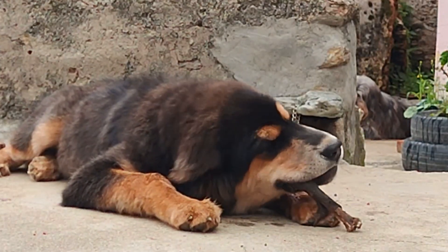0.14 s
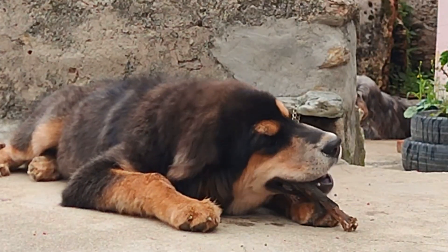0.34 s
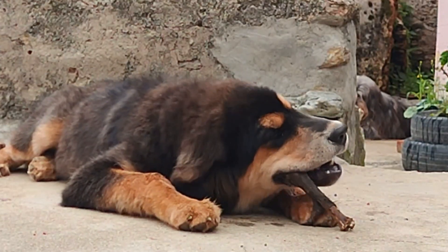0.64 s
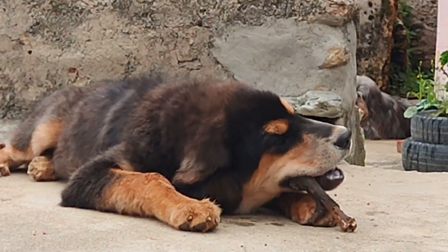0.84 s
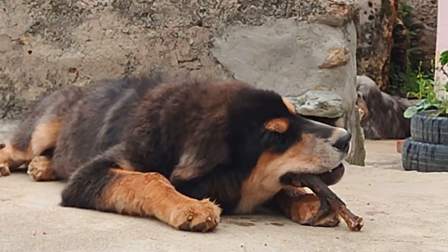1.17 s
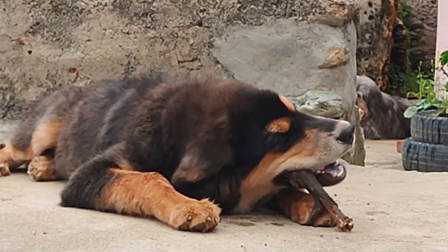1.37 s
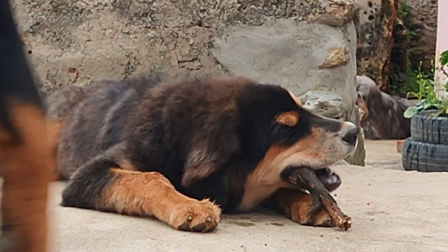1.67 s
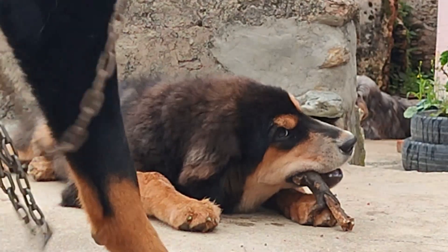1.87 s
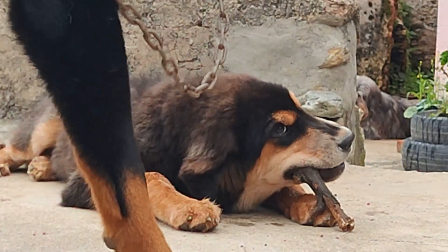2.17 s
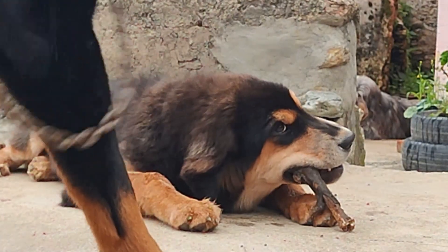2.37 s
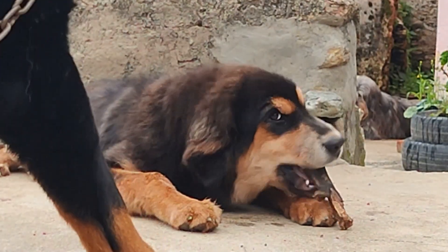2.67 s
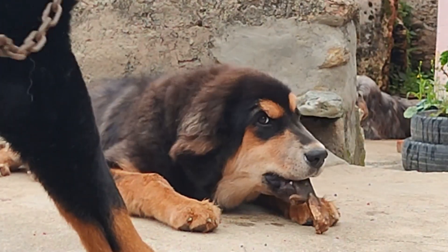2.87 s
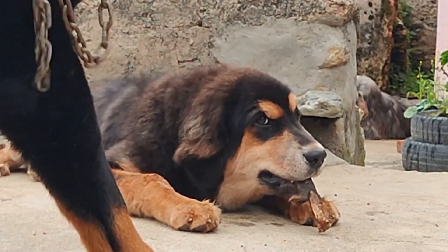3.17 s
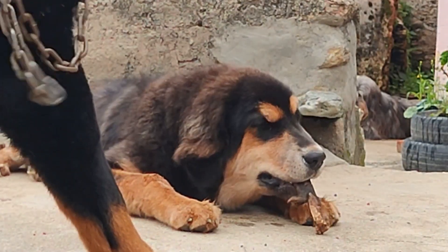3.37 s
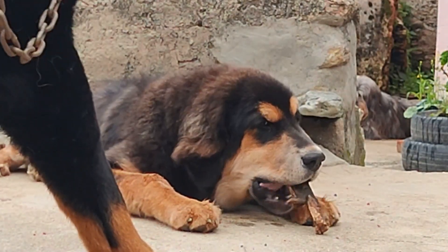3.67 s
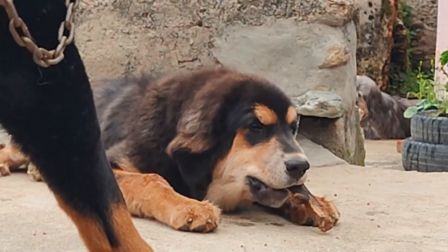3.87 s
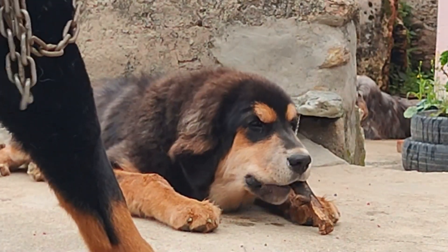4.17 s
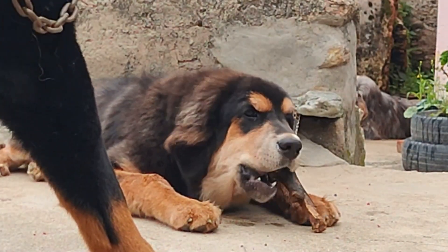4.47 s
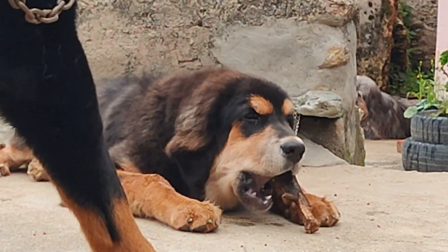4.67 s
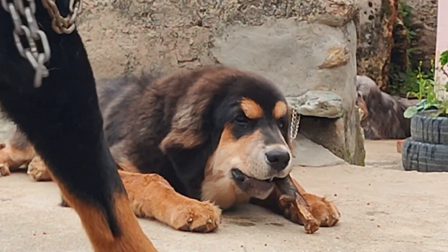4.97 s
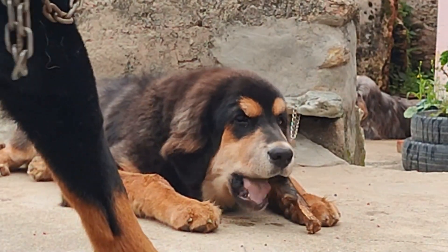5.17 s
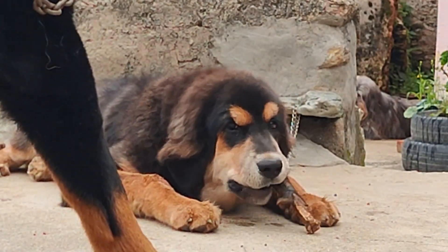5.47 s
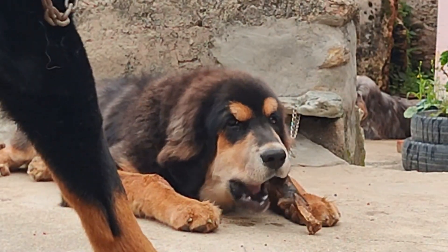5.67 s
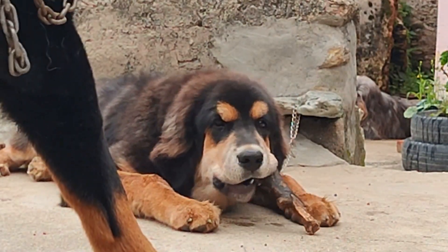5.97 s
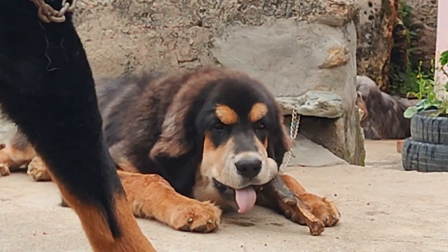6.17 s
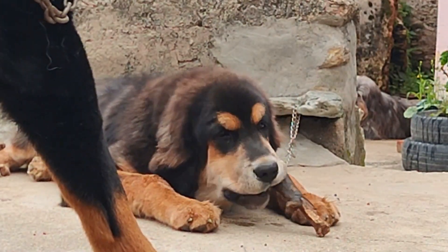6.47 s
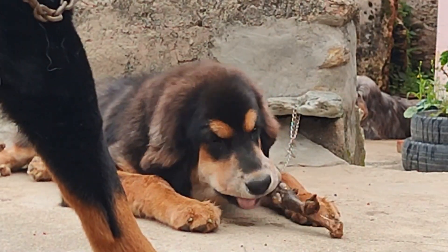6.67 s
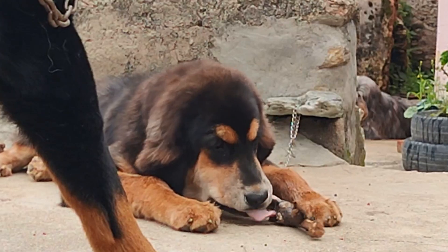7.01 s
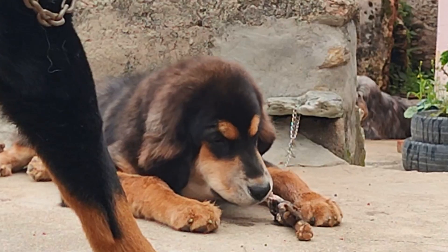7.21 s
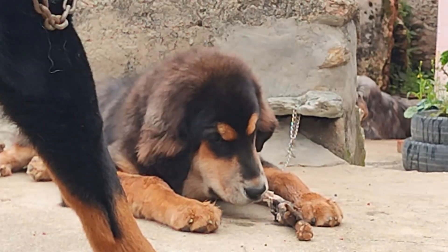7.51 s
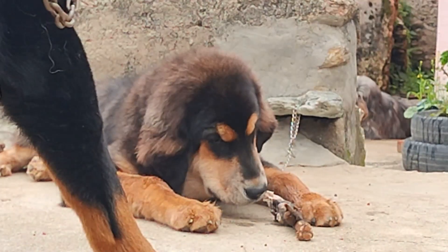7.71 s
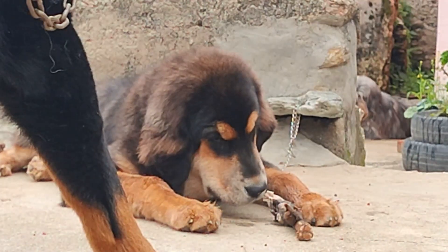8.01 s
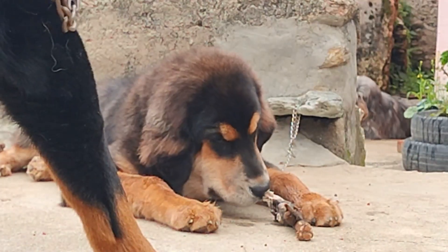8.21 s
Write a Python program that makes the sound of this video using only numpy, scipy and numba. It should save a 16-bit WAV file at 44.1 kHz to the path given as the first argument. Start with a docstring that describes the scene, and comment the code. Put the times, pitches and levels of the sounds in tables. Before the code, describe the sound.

A close stereo pickup in a walled concrete yard, with low rumble, faint hum, hiss and insects throughout. A short, low growl opens at 0 to 0.3 s, with a loud stick crack at 0.2 s and a smaller one near 1 s. A second rattling growl runs from 1.1 to 1.7 s. The chain jangles and slides at 1.7 to 2.1 s, then paws scuff and thud softly and the stick snaps at 2.2 s. The growl from 2.4 to 3.6 s is stronger, flaring into a snarl; a chain clink sounds at 3.2 s. Breathy sniffs follow around 3.7 to 4.2 s. The raspiest growl lasts from 4.2 to 5.4 s, another from 6 to 6.7 s darkens and softens, and a weak, humming one closes at 7.1 to 7.65 s. A bird chirps throughout, with rising trills at 1.4 and 5 s and warbles from 3.8 and 6.35 s; faint distant chatter ends it.

```python
"""In a concrete yard a big puppy lies gnawing a stick and growls six times at a chained dog that steps up.
Its vocal folds buzz while slower, looser folds chop the buzz into a rattle; throat and mouth then ring with it.
The growl flares as the jaw bites, and a shut jaw darkens it. The stick cracks in short ringing bursts, chain links
clink and slide as ringing noise, paws scuff as coloured noise, low tones thud, and a small bird twitters in gliding
tones echoed by the walls, over a low rumble, faint hum and hiss, insects and far birds, all from filtered noise."""
import sys
import numpy as np
from scipy import signal
from scipy.fft import rfft, irfft
from scipy.io import wavfile
from scipy.ndimage import uniform_filter1d
from numba import njit

SR = 44100
rng = np.random.default_rng(int(sys.argv[2]) if len(sys.argv) > 2 else 0)


def waveform_to_disk(signal):
    """Save audio, clipped to [-1, 1], as 16-bit WAV at the path in sys.argv[1]."""
    frames = np.transpose(np.atleast_2d(signal))
    scaled = np.clip(frames, -1, 1) * 32767
    samples = np.round(scaled).astype(np.int16)
    wavfile.write(sys.argv[1], SR, samples)


N = 368087
TIME = np.arange(N) / SR


def undb(db):
    """Turn decibels into a gain."""
    return 10 ** (np.asarray(db) / 20)


def unit(x):
    """Scale a sound to an average (rms) strength of 1."""
    return x / np.sqrt(np.mean(x ** 2) + 1e-20)


def steady(x, span_s=0.044):
    """Even out slow changes of strength, keeping single pulses."""
    size = max(int(span_s * SR), 2)
    power = uniform_filter1d(uniform_filter1d(x * x, size), size)
    return x / np.sqrt(np.abs(power) + 1e-14)


def walk(rate):
    """Smooth random wandering with a spread near 1; rate is in new values per second."""
    count = int(SR / rate)
    steps = np.repeat(rng.standard_normal(N // count + 1), count)
    return 1.3 * uniform_filter1d(steps, count)[:N]


def noise(points):
    """Noise of strength 1 whose tone colour follows points (frequency [Hz], level [dB])."""
    hz, db = np.transpose(points)
    bins_hz = np.arange(N // 2 + 1) * SR / N
    gain = undb(np.interp(np.log(bins_hz + 1), np.log(hz), db))
    return unit(irfft(rfft(rng.standard_normal(N)) * gain, N))


def cut(x, hz, kind, order=2):
    """Remove part of the spectrum with a Butterworth filter."""
    return signal.sosfilt(signal.butter(order, hz, kind, fs=SR, output="sos"), x)


@njit
def svf(x, hz, width):
    """A band-pass filter whose centre and width can move (state-variable form)."""
    y, band, low = np.empty(len(x)), 0., 0.
    for i in range(len(x)):
        g, k = np.tan(np.pi * hz[i] / SR), width[i] / hz[i]
        v = (band + g * (x[i] + 1e-18 - low)) / (1 + g * (g + k))
        band, low, y[i] = 2 * v - band, low + 2 * g * v, k * v
    return y


def ring(x, hz, width_hz):
    """One resonance, with a gain of 1 at its centre."""
    return svf(x, hz + np.zeros(N), width_hz + np.zeros(N))


def formant(x, hz, width_hz):
    """A resonance with steep sides: the same ring twice in a row."""
    return ring(ring(x, hz, width_hz), hz, width_hz)


def add(out, s, sound):
    """Mix a sound in at a time in seconds."""
    i = max(int(s * SR), 0)
    out[i:i + len(sound)] += sound[:N - i]


def swells(table):
    """Rounded envelopes from rows (time [s], length [s], level [dB])."""
    out = np.zeros(N)
    for s, length, db in table:
        add(out, s, undb(db) * signal.windows.tukey(int(length * SR), .5))
    return out


def ticks(table, decay_s):
    """Sharp, quickly dying noise bursts from rows (time [s], peak level [dB])."""
    out, t = np.zeros(N), TIME[:SR // 20]
    for s, db in table:
        burst = rng.standard_normal(len(t)) * np.exp(-t / decay_s)
        add(out, s, undb(db) * burst / np.abs(burst).max())
    return out


def bump(s, half_s):
    """A bell-shaped swell around a moment."""
    return np.exp(-((TIME - s) / half_s) ** 2)


def walls(x, wet_db, t60_s):
    """Direct sound plus scattered returns from the yard walls, different in each ear."""
    t = TIME[:SR // 2]
    fade = np.exp(-np.log(1000) * t / t60_s)  # 60 dB down after t60_s
    tails = rng.standard_normal((2, len(t))) * fade * (t > .004)
    tails /= np.sqrt(np.sum(tails ** 2, axis=1, keepdims=True))
    return x + undb(wet_db) * signal.fftconvolve(x[None], tails, axes=1)[:, :N]


def closures(phase):
    """A unit pulse at every whole turn of a phase, shared between two samples."""
    i = np.flatnonzero(np.diff(np.floor(phase)))
    late = (np.ceil(phase[i]) - phase[i]) / (phase[i + 1] - phase[i])
    out = np.zeros(N)
    out[i], out[i + 1] = 1 - late, late
    return out


# rate of the loose folds at one vocal fold rate [Hz], and the power by which it follows
LOOSE_HZ, LOOSE_AT_FOLD_HZ, LOOSE_FOLLOW = 96.24, 224.1, .6


def larynx(fold_hz, rattle, unsteady, jitter=.072, slow_jitter=.125, shimmer_db=2.36,
           chop=1.2, bias=0.59, flap=0.52):
    """Vocal fold pulses chopped by slower loose folds, and the pure hum of both pairs of folds."""
    wandering_hz = fold_hz * np.exp(jitter * rattle * walk(200) + 0.0079 * walk(30))
    fast = np.cumsum(wandering_hz) / SR
    slow_hz = LOOSE_HZ * (fold_hz / LOOSE_AT_FOLD_HZ) ** LOOSE_FOLLOW
    slow = np.cumsum(slow_hz * np.exp(slow_jitter * walk(100))) / SR
    # the loose folds let a pulse through or smother it, leaving ones and twos that beat into a throb
    gate = np.clip(bias + chop * np.cos(2 * np.pi * slow), 0, 1)
    buzz = closures(fast) * (1 - np.clip(rattle, 0, 1) * (1 - gate))
    buzz = buzz * undb(shimmer_db * unsteady * walk(130))
    fold_hum = unit(np.sin(2 * np.pi * fast) - np.cos(2 * np.pi * fast))
    loose_hum = unit(np.cos(2 * np.pi * slow))
    return buzz, fold_hum - flap * rattle * loose_hum


# the six growls, with the levels they set out from before pushes, bites and fading:
# (time [s], length [s], throat level [dB], mouth level [dB], rasp level [dB],
#  pure hum beside the throat [ratio], unsteadiness [ratio])
GROWL_STARTS = [(-.03, .35, -30, -37.5, -42, 0.4, 1.3), (1.118, 0.62, -30, -32.5, -38, .05, 1.26),
                (2.448, 1.11, -24, -32.5, -34.5, .05, .8), (4.239, 1.123, -22.5, -27, -31, 0.095, 0.62),
                (5.992, .72, -26, -35.5, -40, 0.62, 1), (7.123, 0.527, -32.5, -48, -49, 1.35, 1.6)]
# course of the voice through the growls: (time [s], mean vocal fold rate [Hz], rattle depth [0-1],
#  mouth resonance [Hz], mean snarl resonance [Hz])
VOICE_COURSE = [(0, 186.2, 0.81, 936, 1750), (.32, 187, 0.97, 887, 1900), (1.121, 205.7, .92, 920, 1820),
                (1.4, 199.7, 0.98, 1060, 1760), (1.75, 193.3, 0.96, 1070, 1840),
                (2.46, 237.4, 0.97, 1090, 1730), (2.68, 243.6, 0.89, 936, 1700),
                (2.761, 245.5, 0.84, 850, 1710), (2.859, 232.5, 0.86, 730, 1660),
                (3, 228.1, .85, 777, 1548), (3.25, 216.2, 1, 1015, 1510), (3.54, 211, 0.94, 884.8, 1669),
                (4.24, 241.1, .92, 956, 1570), (4.421, 237.7, 0.95, 955, 1761),
                (4.72, 227.6, 1, 1078, 1550), (4.88, 213.1, 0.95, 762, 1720), (5.179, 220.3, 1, 1000, 1560),
                (5.359, 223.2, 0.81, 717, 1829), (6.001, 226, .98, 1020, 1540), (6.149, 226, 1, 910, 1808),
                (6.266, 219.1, 0.7, 681.3, 1797), (6.62, 215, 0.84, 774, 1860),
                (6.681, 214, 0.1, 740, 1900), (7.14, 198, 0.13, 689, 1855),
                (7.21, 208.2, 0.86, 739.6, 1817), (7.539, 198.6, .85, 688, 1850),
                (7.59, 197.4, 0.48, 695, 1830), (7.649, 185.2, 0.5, 697, 1858)]
# the puppy pushes harder within a growl, or slackens: (time [s], half length [s], throat level change [dB])
VOICE_PUSHES = [(0.245, 0.0096, -24), (1.168, 0.033, 4.5), (1.31, 0.01, -15), (1.695, 0.071, 3.5),
                (3.014, 0.33, 5.5), (4.583, 0.13, 3), (5.348, 0.014, 7.5), (6.335, 0.088, 3),
                (6.71, 0.15, -3.5), (7.22, 0.043, 6.5), (7.439, 0.019, -5), (7.59, 0.032, 4)]
# the jaw bites down on the stick in mid-growl and the voice flares:
# (time [s], half length [s], mouth level change [dB], rasp level change [dB])
STICK_BITES = [(2.702, 0.13, 8.5, 6.5), (2.76, 0.023, 1, 6), (2.938, 0.087, 7.5, 4), (4.393, 0.033, 2.5, 7),
               (4.822, 0.052, 5.5, 4), (5.257, 0.03, 9, 8.5), (6.156, .05, 6.5, 4), (6.491, .09, 5, -1.5),
               (7.218, .025, 9, -2)]
ATTACK_S, RELEASE_S = 0.015, .018
LIPS_PART_S = 0.037  # the mouth comes in more slowly than the throat
OPEN_HZ, SHUT_HZ = 1017, 706  # mouth resonance with the jaw open and shut
SHUT_MOUTH_DB, SHUT_RASP_DB = -2, -9.5  # what a shut jaw does
THROAT_FADE_DB_PER_S, MOUTH_FADE_DB_PER_S, RASP_FADE_DB_PER_S = 3, 9, 11.5  # the air runs out
MOUTH_PUSH, RASP_PUSH = 0.51, 0.91  # shares of a push, in dB, that reach the mouth and the rasp


def gestures():
    """Growls fade as the air runs out; pushes swell them, bites flare them, a shut jaw darkens them."""
    s, *course = np.transpose(VOICE_COURSE)
    fold_hz, rattle, mouth_hz, snarl_hz = (np.interp(TIME, s, column) for column in course)
    shut = np.clip((OPEN_HZ - mouth_hz) / (OPEN_HZ - SHUT_HZ), 0, 1)
    push_db = sum(db * bump(s, half_s) for s, half_s, db in VOICE_PUSHES)
    mouth_flare_db, rasp_flare_db = sum(
        np.outer(flare_db, bump(s, half_s)) for s, half_s, *flare_db in STICK_BITES)
    mouth_change_db = MOUTH_PUSH * push_db + mouth_flare_db + SHUT_MOUTH_DB * shut
    rasp_change_db = RASP_PUSH * push_db + rasp_flare_db + SHUT_RASP_DB * shut
    controls = np.zeros(N)
    for start, length, throat_db, mouth_db, rasp_db, *manner in GROWL_STARTS:
        age = np.clip(TIME - start, 0, length)
        voiced = np.clip(np.minimum(age / ATTACK_S, (length - age) / RELEASE_S), 0, 1)
        lips = np.minimum(age / LIPS_PART_S, 1)
        levels_db = [throat_db + push_db - THROAT_FADE_DB_PER_S * age,
                     mouth_db + mouth_change_db - MOUTH_FADE_DB_PER_S * age,
                     rasp_db + rasp_change_db - RASP_FADE_DB_PER_S * age]
        this = np.broadcast_arrays(voiced, lips, *levels_db, *manner)
        controls = np.where(TIME >= start, this, controls)
    return fold_hz, rattle, mouth_hz, snarl_hz, *controls


# throat and nose resonances, levels relative to one another: (frequency [Hz], width [Hz], level [dB])
THROAT_RESONANCES = [(93, 37, -1), (172, 32, -4.5), (226.6, 77, -3.5), (390.6, 57, 1.5), (449, 39, 1),
                     (670, 30, -1)]
SNARL_WIDTH_HZ = 483  # of each of the snarl's two rings
# a faint resonance high in the head, above the snarl
HEAD_HZ, HEAD_WIDTH_HZ, HEAD_DB = 2840, 680, -18


def growl(lag_s=.0001, tremor_db=1.5, snap_db=2.5, gape=1.0, tongue=0.039, puff=5, puff_hz=170,
          turbulence=0.045, mouth_lag_s=.0009):
    """Larynx pulses ring the fixed throat and the moving mouth and lips."""
    (fold_hz, rattle, mouth_hz, snarl_hz, voiced, lips,
     throat_db, mouth_db, rasp_db, hum_ratio, unsteady) = gestures()
    closing, hum = larynx(fold_hz, rattle, unsteady)
    # each closure cuts the airflow: a drop in pressure
    pulses = -closing
    throat = np.zeros(N)
    for hz, width, db in THROAT_RESONANCES:
        breath = turbulence / 2 * rattle * rng.standard_normal(N)
        throat += undb(db) * ring(pulses + breath, hz, width)
    throat = cut(cut(throat, 631, "low", order=6), 71, "high", order=2)
    # a gentle growl closes the folds softly, so their fundamentals lead
    throat = steady(throat) + hum_ratio * hum
    # some closures snap harder than others, and the turbulent air puffs up after each
    sharp = pulses * undb(snap_db * unsteady * walk(150))
    puffs = puff * cut(sharp, puff_hz, "low", order=1) - turbulence
    rasp = sharp + puffs * rng.standard_normal(N)
    mouth = ring(pulses + .5 * rasp, mouth_hz, 130)
    mouth = ring(ring(mouth, 0.65 * mouth_hz, 190), 0.81 * mouth_hz, 590)
    # a gaping jaw adds a higher resonance
    wide = gape * np.clip((mouth_hz - OPEN_HZ) / 150, 0, 1)
    mouth = steady(mouth) + wide * steady(formant(rasp, 1.28 * mouth_hz, 330))
    # the snarl moves with the lips, and the tongue makes it waver
    snarl = formant(rasp, snarl_hz * (1 + tongue * walk(20)), SNARL_WIDTH_HZ)
    head = snarl - undb(HEAD_DB) * formant(rasp, HEAD_HZ, HEAD_WIDTH_HZ)
    head = cut(head, 3360, "low", order=5)
    # a weak growl flutters more than a well-driven one
    strength = voiced * undb(tremor_db * unsteady * walk(60))
    low = strength * steady(throat) * undb(throat_db)
    high = strength * lips * (steady(mouth) * undb(mouth_db) + steady(head) * undb(rasp_db))
    # each pulse leaves the mouth as a crest just after the dip in the throat
    high = -np.interp(TIME - mouth_lag_s, TIME, high)
    # the mouth is aimed at the left side, which the growl reaches first; the bass spreads all round
    low, high = walls(low, wet_db=-16, t60_s=.25), walls(high, wet_db=-9.5, t60_s=.16)
    left, right = low + high * undb([[3], [-3.8]])
    return np.array([left, np.interp(TIME - lag_s, TIME, right)])


# colour of the outdoor rumble and hiss: (frequency [Hz], relative level [dB per Hz])
YARD_COLOUR = [(25, 10), (120, 5.5), (200, 4.5), (320, 1.5), (1100, -11.5), (2700, -8), (3300, -10.5),
               (6000, -8), (7600, -10), (8800, -31.5), (14000, -24.5)]
YARD_DB = -48  # mean level of the part shared by both sides
# steady low tones: (frequency [Hz], level [dB])
HUM_TONES = [(94, -61), (139, -56)]
# insect bands, level before slow wavering: (frequency [Hz], half the width of each of two rings [Hz], level [dB])
INSECT_BANDS = [(3976, 240, -54), (6876, 93, -59)]
# other birds chatter far off, level before wavering: (time [s], length [s], level of each of two bands [dB])
FAR_CHATTER = [(7.3, 0.25, -51), (7.76, 0.15, -51)]


def yard():
    """Outdoor rumble, mostly alike on both sides, a wavering hum, and insects and far birds from all round."""
    side = cut(noise(YARD_COLOUR), 900, "high", order=1) + .5 * cut(noise(YARD_COLOUR), 40, "low")
    air = undb(YARD_DB + walk(11)) * (noise(YARD_COLOUR) + side * np.array([[1], [-1]]))
    # very narrow bands of noise sound like wavering tones
    hum = sum(undb(db) * unit(ring(rng.standard_normal(N), hz, 2.5)) for hz, db in HUM_TONES)
    ears = []
    for _ in range(2):
        insects = np.zeros(N)
        for hz, width, db in INSECT_BANDS:
            insects += undb(db + walk(27)) * unit(formant(rng.standard_normal(N), hz, 2 * width))
        chatter = sum(unit(formant(rng.standard_normal(N), hz, hz / 5)) for hz in (2750, 4900))
        ears.append(insects + chatter * swells(FAR_CHATTER) * undb(2 * walk(60)))
    return air + hum + np.array(ears)


# teeth crack or tap the stick, levels before echoes and panning:
# (time [s], starting level [dB], ringing frequency [Hz], ring decay [s])
STICK_CRACKS = [(0.1954, -13.5, 1490, 0.0017), (.56, -34.5, 680, 0.0026), (1.014, -20.5, 1490, 0.00052),
                (2.187, -15.5, 2720, 0.00083)]
# the puppy draws air between growls, before flutter, echoes and panning: (time [s], length [s], level [dB])
AIR_SNIFFS = [(2.235, 0.059, -43.5), (3.69, 0.06, -42.5), (3.83, 0.067, -46), (3.9, 0.31, -48.5),
              (5.68, 0.29, -47.5)]


def chewing():
    """The stick cracks between the teeth and rings briefly; air hisses past it."""
    cracks, t = np.zeros(N), TIME[:SR // 20]
    for s, db, hz, decay_s in STICK_CRACKS:
        add(cracks, s, undb(db) * np.exp(-t / decay_s) * np.sin(2 * np.pi * hz * t))
        crunch = cut(ticks([(s, db)], decay_s=0.0026), [1000, 3 * hz], "band")
        cracks += crunch * undb(-0.5)
    air = noise([(150, -17.5), (550, -3), (900, -8.5), (1250, -6), (1750, -2.5), (2400, -16.0), (12000, -92)])
    sniffs = air * swells(AIR_SNIFFS) * undb(2 * walk(45))
    return walls(cracks + sniffs, wet_db=-2.0, t60_s=0.47) * undb([[1.5], [-1.5]])  # a little to the left


# strokes of one twitter, before each twitter's own pitch and level:
# (delay [s], length [s], start [Hz], end [Hz], level change [dB])
TWITTER_STROKES = [(0, 0.031, 5430, 7654, 1.5), (0.03, 0.0163, 5044, 3965, -3),
                   (0.067, .026, 5500, 7000, 2.5), (.082, 0.019, 6700, 4560, -5.5)]
TWITTER_GAP_S, FIRST_PITCH, PITCH_STEP = .155, 0.91, 0.039  # pitch as a ratio, and its rise per twitter
TRILL_DB, TRILL_SWELL_DB = -28, 7  # level it swells towards, and how far below it the first twitter lies
SECOND_VOICE_DB = -10  # beside the first voice


def trill(second_voice=2.4, bend=0.41, count=4):
    """Twitters rise and swell, while a softer second voice sweeps down into each stroke."""
    strokes = []
    for k in range(count):
        ratio = FIRST_PITCH + PITCH_STEP * k
        twitter_db = TRILL_DB - TRILL_SWELL_DB * np.exp(-k)
        for delay, length, start_hz, end_hz, db in TWITTER_STROKES:
            strokes.append((k * TWITTER_GAP_S + delay, length, ratio * start_hz, ratio * end_hz, twitter_db + db))
    top_hz = TWITTER_STROKES[0][3]
    strokes += [(s - length / 2, length, min(second_voice * end_hz, top_hz), start_hz, db + SECOND_VOICE_DB)
                for s, length, start_hz, end_hz, db in strokes]
    return [(s, length, start_hz, start_hz + bend * (end_hz - start_hz), end_hz, db)
            for s, length, start_hz, end_hz, db in strokes]


# pitches below are before a small random shift and waver; levels are before the wall echoes
# other bird notes, some leading into trills or sounding within a warble:
# (time [s], length [s], start [Hz], middle [Hz], end [Hz], level [dB])
OTHER_NOTES = [(0.624, 0.041, 6380, 4930, 3600, -39), (0.919, 0.036, 5510, 5510, 5085, -33),
               (1.043, 0.047, 6280, 6660, 5940, -32.5), (1.171, 0.05, 6500, 5230, 3940, -36.5),
               (1.234, 0.048, 3470, 4070, 3540, -36.5), (2.035, 0.071, 5830, 4980, 4520, -42.5),
               (2.092, 0.066, 5800, 6000, 6150, -35), (2.283, 0.089, 5590, 6517, 8100, -37),
               (2.495, 0.14, 5465, 5060, 4570, -47), (4.455, .08, 6060, 5120, 4700, -49.5),
               (4.468, 0.084, 7804, 6700, 6370, -40), (4.807, 0.029, 5932, 4670, 4050, -38),
               (4.864, 0.032, 4270, 4145, 3740, -37),]
# notes of a warble, some overlapping: (delay [s], length [s], start [Hz], middle [Hz], end [Hz], level [dB])
WARBLE_NOTES = [(0, .19, 6360, 4850, 5680, -43.5), (0.263, 0.045, 4720, 5498, 7392, -43.5),
                (0.301, 0.15, 6597, 5990, 7320, -39), (0.478, 0.11, 8500, 7300, 7500, -43.5),
                (0.583, .12, 7050, 5820, 6530, -39.5), (0.651, 0.07, 6650, 6960, 8090, -38.5),
                (0.772, .1, 4350, 5000, 7000, -43.5), (.845, 0.041, 6100, 6550, 6920, -41.5),
                (0.996, 0.085, 5600, 5030, 4480, -48), (0.904, 0.14, 7610, 6160, 4740, -41)]
# when the same warble is sung: (time [s])
WARBLE_TIMES = [3.828, 6.35]
# when the trills start: (time [s])
TRILL_TIMES = [1.399, 5.006]


def bird(other_waver=0.014, warble_waver=0.021, trill_waver=0.044, scatter=.015):
    """Curved gliding notes, warbles and quick, ragged two-voiced trills, echoed by the walls."""
    phrases = [(0.0002, OTHER_NOTES, other_waver)]
    phrases += [(s, WARBLE_NOTES, warble_waver) for s in WARBLE_TIMES]
    phrases += [(s, trill(), trill_waver) for s in TRILL_TIMES]
    out, wobble = np.zeros(N), walk(1200)
    for s, notes, depth in phrases:
        for delay, length, start_hz, middle_hz, end_hz, db in notes:
            u = np.linspace(0, 1, int(length * SR))
            # a smooth curve through the three pitches
            glide = np.polyval(np.polyfit([0, .5, 1], [start_hz, middle_hz, end_hz], 2), u)
            ragged = 1 + depth * wobble[int((s + delay) * SR):][:len(u)]
            hz = glide * (1 + scatter * rng.standard_normal()) * ragged
            tone = np.sin(2 * np.pi * np.cumsum(hz) / SR)
            add(out, s + delay, undb(db) * signal.windows.tukey(len(u), .5) * tone)
    # near walls thicken each note, far ones leave a tail
    echoed = undb(-8.0) * (walls(out, wet_db=11.0, t60_s=0.051) + walls(out, wet_db=7, t60_s=0.6))
    return echoed * undb([[-1], [0]])


# chain links knock, relative levels before the links ring: (time [s], peak level [dB])
CHAIN_CLINKS = [(1.485, -28), (1.7844, -18), (2.5437, -35), (3.028, -37.5), (3.2326, -22), (3.3026, -31.5),
                (3.9698, -33), (4.9238, -29), (5.877, -32)]
# the chain slides, levels before the links ring: (time [s], length [s], level [dB])
CHAIN_SLIDES = [(1.73, 0.078, -27), (1.82, 0.25, -37), (2.27, 0.049, -30), (3.235, .11, -39.5)]
# the notes at which a link rings: (frequency [Hz], relative level [dB])
LINK_MODES = [(7300, 1), (11500, -20), (13200, -22)]
# paws scuff the concrete, levels before flutter and echoes: (time [s], length [s], level [dB])
PAW_SCUFFS = [(1.73, 0.067, -36), (2.172, 0.074, -37.5), (2.305, 0.024, -41.5), (2.37, 0.063, -44.5)]
# colour of the scuffs: (frequency [Hz], relative level [dB])
SCUFF_SPECTRUM = [(60, -7), (200, -15), (550, -2.5), (900, -17), (1700, -9), (3000, -19.5), (7000, -14.5),
                  (12000, -55)]
# low thuds of paws landing and the stick knocking the ground, levels before echoes:
# (time [s], length [s], frequency [Hz], peak level [dB])
LOW_THUDS = [(1.936, 0.031, 58.7, -28), (2.195, 0.05, 117, -36), (2.211, 0.0059, 450, -24),
             (6.84, 0.044, 225.4, -39)]


def chain_and_ground():
    """Chain links ring from knocks and slides; paws scuff as noise; paws and stick thud as short low tones."""
    grains = unit(rng.standard_normal(N) * undb(3.0 * walk(500)))
    knocks = ticks(CHAIN_CLINKS, decay_s=0.0047) * undb(13) + grains * swells(CHAIN_SLIDES)
    ringing = sum(undb(db) * ring(knocks, hz, 340) for hz, db in LINK_MODES)
    chain = 0.089 * cut(knocks, 2600, "high") + 1.3 * ringing
    ground = noise(SCUFF_SPECTRUM) * swells(PAW_SCUFFS) * undb(1.93 * walk(150))
    for s, length, hz, db in LOW_THUDS:
        t = TIME[:int(length * SR)]
        add(ground, s, undb(db) * np.hanning(len(t)) * np.sin(2 * np.pi * hz * t))
    return walls(1.4 * chain + ground, wet_db=-6, t60_s=.15)


def scene():
    """Everything in the yard, added together."""
    return growl() + yard() + chewing() + bird() + chain_and_ground()


TOP_HZ = 14500


def record(dry):
    """Round off the loudest peaks, then cut the treble steeply above TOP_HZ."""
    rounded = np.tanh(1.1 * dry) / 1.1
    return signal.sosfilt(signal.ellip(8, .2, 70, TOP_HZ, fs=SR, output="sos"), rounded)


dry = scene()
out = record(dry)
waveform_to_disk(out)
```